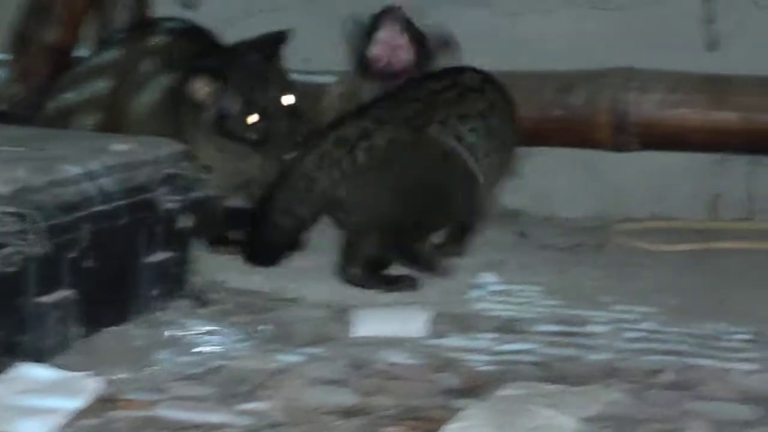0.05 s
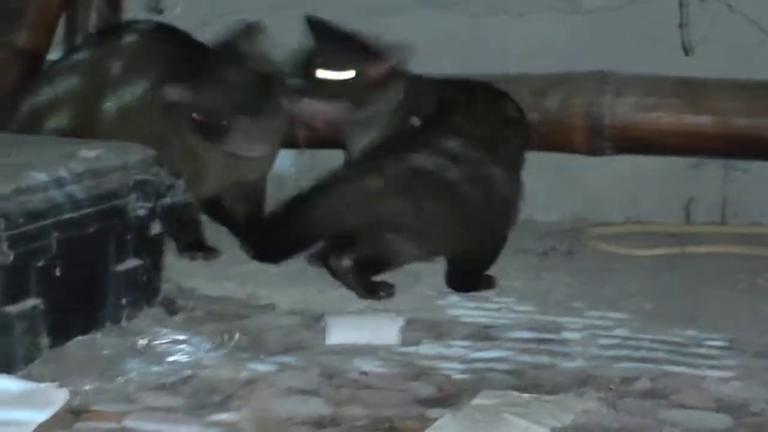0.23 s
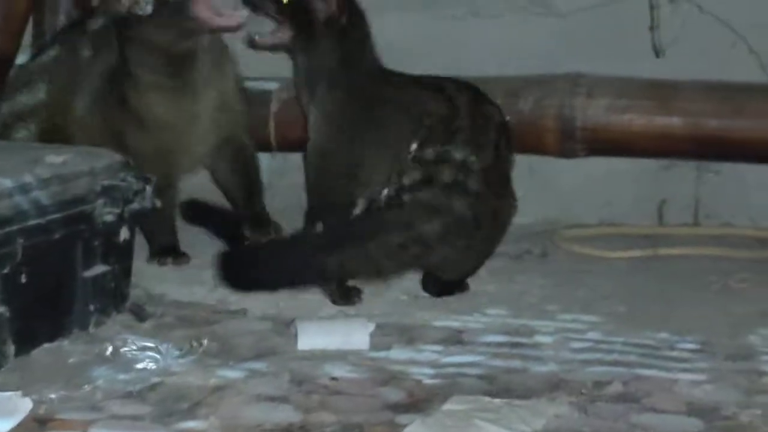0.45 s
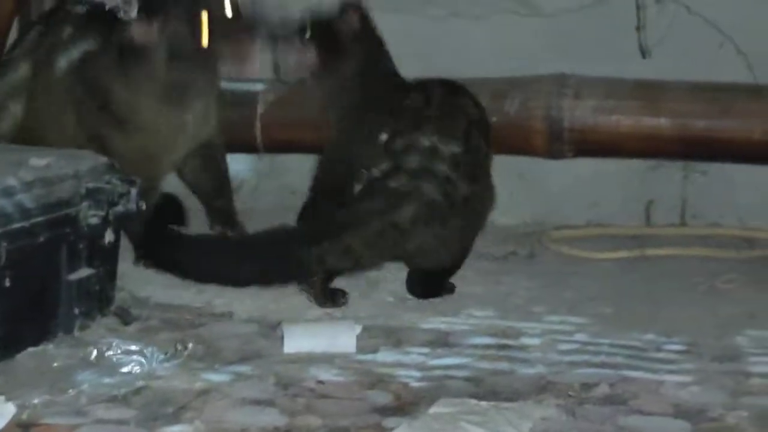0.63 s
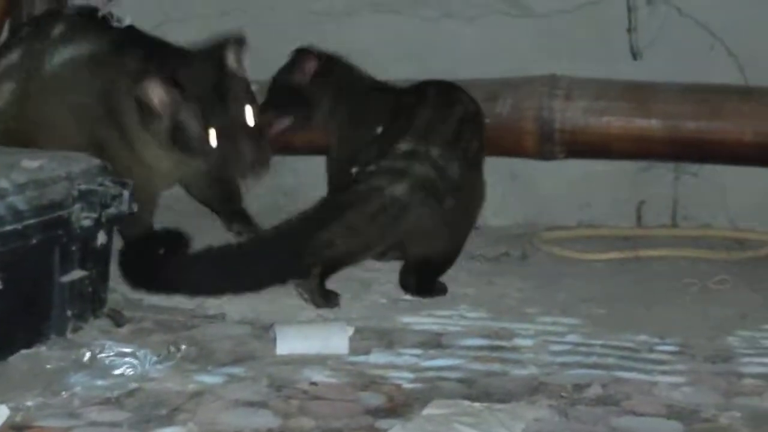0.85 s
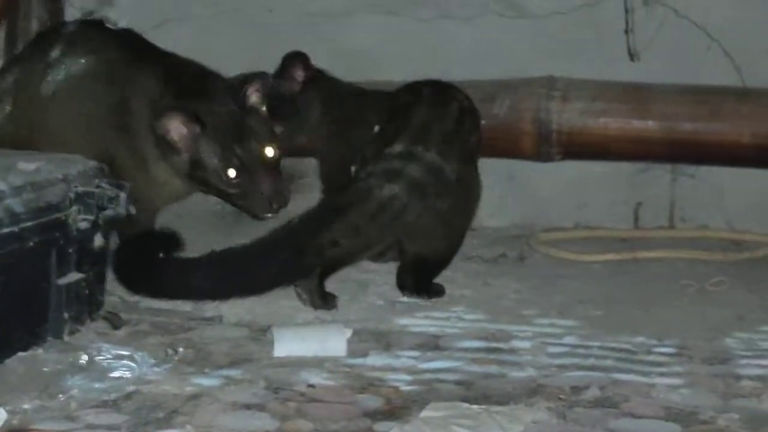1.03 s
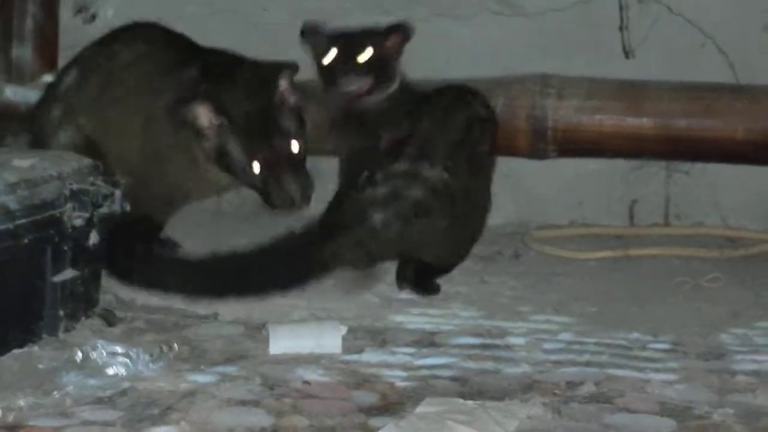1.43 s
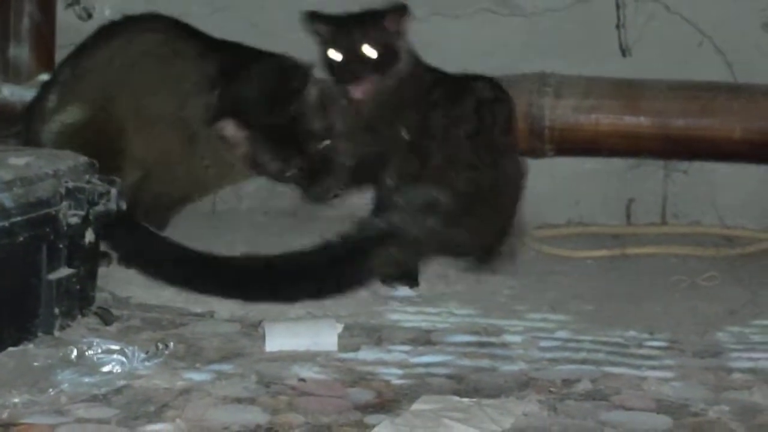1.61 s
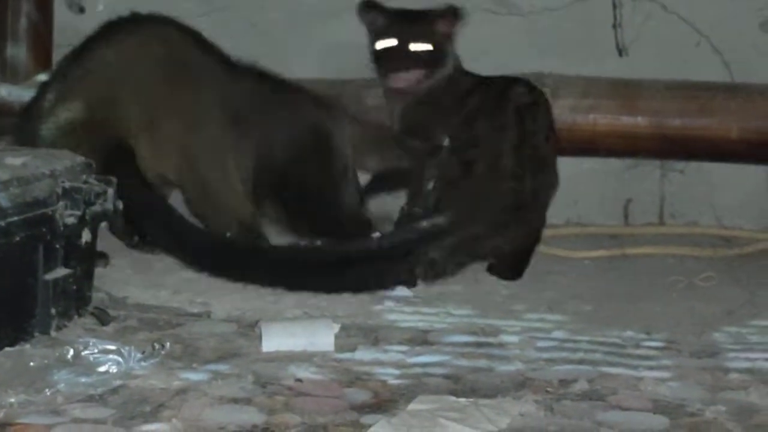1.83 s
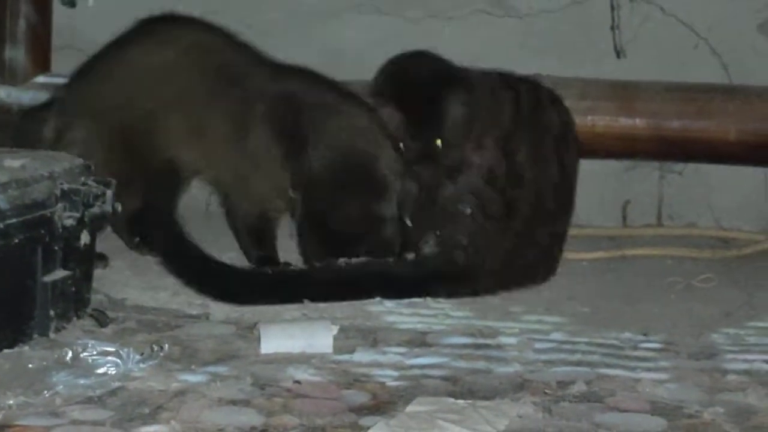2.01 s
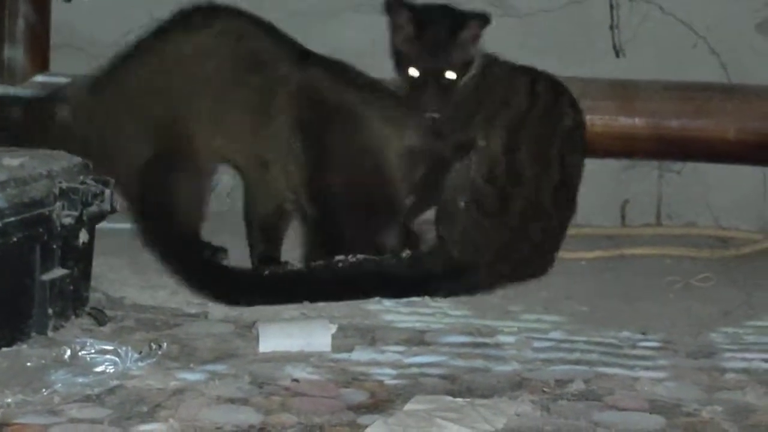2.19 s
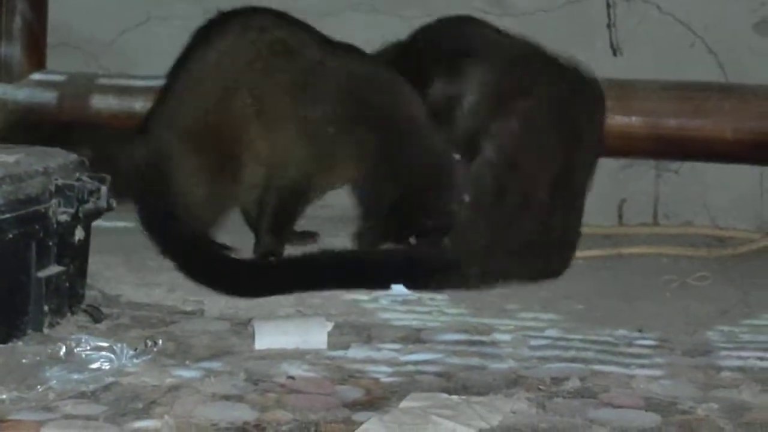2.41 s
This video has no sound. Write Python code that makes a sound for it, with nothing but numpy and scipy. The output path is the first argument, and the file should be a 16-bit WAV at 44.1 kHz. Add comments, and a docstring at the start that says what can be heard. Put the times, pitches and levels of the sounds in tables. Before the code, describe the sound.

Two civets squabble close by in a small, slightly echoing room. Raspy squeaky chatter at 0.2 seconds leads to a brief shriek at 0.4, then a hoarse grumble and snarl until 0.8. After a lull, a sharp yip comes at 1.7, a wavering whine from 1.8 to 2.2, a whimper, and a loud squeak at 2.5. Claws occasionally scuff the hard floor, and a faint low machine hum throbs throughout.

```python
"""Two civets squabble on the hard floor of a small bare room, close to a stereo microphone pair.
Their arched squeaks, whines and raspy chatter are a strong fundamental plus overtones shaped by the
throat, turning hoarse in places. Claws scuff the floor now and then; floor, crate and walls throw back
short echoes. Farther back a low machine hum throbs over rumble and faint hiss."""
import sys
import numpy as np
from scipy import signal
from scipy.fft import rfft, irfft
from scipy.io import wavfile

SR = 44100
rng = np.random.default_rng(int(sys.argv[2]) if len(sys.argv) > 2 else 0)


def store_pcm(level_fs):
    """Save levels as 16-bit WAV."""
    pcm = np.round(np.clip(level_fs, -1, 1) * 32767).astype(np.int16)
    wavfile.write(sys.argv[1], SR, np.atleast_2d(pcm).T)


N = 112454
TIME_S, BIN_HZ = np.arange(N) / SR, np.arange(N // 2 + 1) * SR / N
TOP_HZ = 15700


def undb(db):
    """Decibels to gain."""
    return 10 ** (np.asarray(db) / 20)


def unit(x):
    """Scale to rms 1."""
    return x / np.sqrt(np.mean(x ** 2) + 1e-30)


def at(hz, points):
    """Read (freq_hz, value) points on a log-frequency axis."""
    freqs, values = np.array(points, float).T
    return np.interp(np.log(np.maximum(hz, 1)), np.log(freqs), values)


def noise(gain):
    """Noise of rms 1, coloured by a gain at each frequency."""
    return unit(irfft(rfft(rng.standard_normal(N)) * gain, N))


def stereo_noise(gain):
    """Independent noise at each microphone."""
    return np.array([noise(gain), noise(gain)])


def wander(hz):
    """Smooth random drift with changes up to about hz."""
    return noise(np.exp(-(BIN_HZ / hz) ** 2))


def pan(db):
    """Microphone gains for a level difference; positive is to the left."""
    return unit(undb(np.array([[db], [-db]]) / 2))


# Machine hum tones: pitch_hz, level_db
HUM_TONES = [(78.4, -53.5), (120, -61), (192.5, -69)]


def machine_hum(waver=.35, waver_hz=9, throb_db=3):
    """A machine in the background: each low tone wavers, and all throb together."""
    hum = 0
    for hz, db in HUM_TONES:
        drift = 1 + waver * (wander(waver_hz) + 1j * wander(waver_hz))
        tone = np.exp(2j * np.pi * (hz * TIME_S + rng.random()))
        hum += undb(db) * np.sqrt(2) * np.real(drift * tone)
    return hum * undb(throb_db * wander(12))


# Room tone spectra: freq_hz, relative_db
RUMBLE_SPECTRUM = [(20, -15.5), (38, -11.5), (52, -1.5), (64, 12.5), (78, -8.5), (90, -3.5), (104, 9),
                   (135, -5), (160, -10), (230, -12.5), (300, -20.5), (500, -43.5), (900, -43)]
HISS_SPECTRUM = [(240, -42), (400, 3), (605, -7.5), (694, -1), (1050, -7.5), (1360, -14), (1610, -11.5),
                 (2710, -5), (3460, -13), (5230, -11), (7440, -24), (7910, -22.5), (15500, -11.5)]


def room_tone():
    """Rumble, nearly alike at both microphones, and a wide faint hiss; returns the two apart."""
    low = undb(at(BIN_HZ, RUMBLE_SPECTRUM)) * (BIN_HZ < 1500)
    high = undb(at(BIN_HZ, HISS_SPECTRUM))
    rumble = undb(-53) * (noise(low) + .25 * stereo_noise(low))
    hiss = undb(-70.5) * (.3 * noise(high) + stereo_noise(high))
    return rumble, hiss


# Reverberation of the bare room: band_hz, t60_s, relative_db
REVERB_BANDS = [(500, .31, -0.5), (1023, 0.21, -2), (2500, 0.22, -4), (5000, 0.22, -10),
                (9000, 0.21, -10.5), (14070, .18, -8.5)]


def reverb(sound, gain_db=-8.5, delay_s=.012, build_s=.002):
    """Dense wall reflections, different at each microphone; the treble dies first."""
    late_s = np.maximum(TIME_S - delay_s, 0)
    spectrum = rfft(rng.standard_normal((2, N)))
    response = 0
    for hz, t60, db in REVERB_BANDS:
        band = at(BIN_HZ, [(row[0], row[0] == hz) for row in REVERB_BANDS])
        tail = (1 - np.exp(-late_s / build_s)) * np.exp(-np.log(1000) * late_s / t60)
        response += irfft(spectrum * band, N) * undb(db) * tail / np.linalg.norm(tail)
    return undb(gain_db) * signal.fftconvolve(sound, response, axes=1)[:, :N]


# Echo paths from floor, crate and walls to the microphones: left_delay_ms, right_delay_ms, gain_db
ECHO_PATHS = [(0.906, 1.1, -12), (2.738, 2.6, -13), (5.25, 5.8, -15), (13.2, 17, -9.5), (43.9, 40, -21)]


def with_echoes(sound):
    """Direct sound plus echoes off hard surfaces, which make overtones uneven and fray call endings."""
    out = sound.copy()
    for *delays_ms, db in ECHO_PATHS:
        for mic, ms in enumerate(delays_ms):
            out[mic] += undb(db) * np.pad(sound[mic], (int(ms * SR / 1000), 0))[:N]
    return out


# Swells of high hiss: centre_s, half_length_s, level_db
HISS_SWELLS = [(1.825, 0.055, -58.5), (2.325, 0.02, -58.5)]


def hiss_swells(centre_hz=14000, width_hz=1400):
    """Faint airy hiss that rises and falls at both microphones."""
    colour = np.exp(-((BIN_HZ - centre_hz) / width_hz) ** 2)
    envelope = sum(undb(db) * np.exp(-((TIME_S - s) / half) ** 2) for s, half, db in HISS_SWELLS)
    return envelope * stereo_noise(colour)


# Claws and fur on the floor: peak_s, level_db, decay_s, centre_hz
FLOOR_SCUFFS = [(0.091, -45.5, 0.011, 2500), (.09, -56.5, 0.0097, 1080), (0.092, -54, 0.011, 9000),
                (.32, -60, 0.017, 5540), (.889, -55, 0.0091, 5000), (1.263, -73, 0.0064, 6000),
                (1.568, -74.5, 0.006, 5950), (1.592, -67.5, .008, 6090), (2.166, -38.5, 0.0094, 5130),
                (2.272, -78, .005, 5090), (2.474, -65, 0.014, 4500)]


def claw_scuffs(attack_s=.002, width_octaves=.35):
    """Claws rub the hard floor in brief bursts of band noise."""
    out = 0
    for peak_s, db, decay_s, hz in FLOOR_SCUFFS:
        octaves = np.log2((BIN_HZ + 1) / hz)
        colour = np.exp(-.5 * (octaves / width_octaves) ** 2) + .04 * (BIN_HZ > 400)
        age_s = TIME_S - peak_s
        envelope = np.clip(age_s / attack_s + 1, 0, 1) * np.exp(-np.maximum(age_s, 0) / decay_s)
        out += undb(db) * envelope * stereo_noise(colour)
    return out


# Phase lead of the left microphone over the right: freq_hz, lead_rad
MIC_PHASE = [(300, .2), (1100, 0.92), (2200, 0.73), (4400, 0.88), (6100, 1.1), (8000, 2), (12000, 2.4)]


def partial(order, pitch_hz, phase):
    """One partial of the voice, reaching the left microphone slightly ahead in phase."""
    offset = np.array([[.5], [-.5]]) * at(order * pitch_hz, MIC_PHASE)
    return np.sqrt(2) * np.sin(order * phase + offset)


# Resonances of the throat: freq_hz, gain_db
THROAT_RESPONSE = [(900, -16.5), (1450, -36.5), (1900, -19.5), (2450, -4), (3200, 0.5), (3900, -3.5),
                   (4800, -2), (5500, 3.5), (6300, -17.5), (7600, -8.5), (9300, -26), (10700, -22.5),
                   (12500, -35), (14300, -25), (15500, -38)]


def throat_gain(hz, tilt_db_per_octave, mouth_hz, mouth_db):
    """Throat resonances, tilted in brightness and lifted by one mouth resonance."""
    mouth = mouth_db * np.exp(-((hz - mouth_hz) / 450) ** 2)
    tilt = tilt_db_per_octave * np.log2(np.maximum(hz, 500) / 4000)
    return undb(at(hz, THROAT_RESPONSE) + mouth + tilt) * (hz < TOP_HZ)


# Contours of the close calls: time_s, pitch_hz, fundamental_db, second_harmonic_db, overtones_db
CHATTER = [(0.163, 506.1, -45.5, -54.5, -64.5), (0.175, 643.9, -35, -42.5, -50),
           (0.183, 674.8, -31, -57.5, -56), (0.195, 713.7, -31, -52, -47.5),
           (0.209, 985.9, -25, -45.5, -33.5), (0.229, 980.9, -40, -43, -44.5),
           (0.237, 973.1, -28.5, -60, -36), (0.245, 917.7, -33, -47.5, -40),
           (0.26, 896.3, -37.5, -67, -49.5)]
SHRIEK = [(0.346, 829.6, -43, -60.5, -32), (0.354, 882.4, -34.5, -48.5, -17.5),
          (0.366, 1070, -22, -38.5, -14.5), (0.376, 1073, -23, -37, -13), (0.395, 1001, -35.5, -55, -29)]
GRUMBLE = [(0.545, 860, -59, -76, -67), (0.569, 863.5, -50.5, -55, -62), (0.581, 782, -44.5, -73, -48),
           (0.591, 597, -52, -45.5, -38), (0.601, 619.7, -51, -51, -39), (0.615, 726, -42.5, -57, -41.5),
           (0.623, 765, -48.5, -56, -48.5), (0.639, 741, -38.5, -72, -63), (0.672, 773, -56, -72, -87)]
SNARL = [(0.674, 570.3, -62, -66, -80), (0.68, 589.4, -41, -56, -67), (0.704, 561.5, -42, -42, -53.5),
         (0.724, 698, -40.5, -57, -22.5), (0.742, 744.7, -36, -45.5, -26.5), (0.75, 797.6, -42, -71, -26.5),
         (0.762, 889, -36.5, -43, -32.5), (0.785, 889, -49, -69, -44)]
YIP = [(1.673, 618, -44, -52, -38), (1.679, 708.6, -49, -57, -28), (1.693, 804, -35, -53, -14),
       (1.707, 783.5, -33, -40.5, -20.5), (1.713, 753, -43, -82, -31.5), (1.718, 724, -36.5, -52, -24)]
LONG_WHINE = [(1.847, 556, -45.5, -49, -43.5), (1.865, 740.5, -37, -56.5, -28),
              (1.879, 811, -39, -49, -19.5), (1.895, 841.3, -36, -44, -21.5), (1.913, 811, -36.5, -48, -38),
              (1.931, 820, -39, -82, -40), (1.943, 815, -37, -58, -69), (1.953, 659, -36, -48, -97),
              (1.985, 639.6, -28, -43, -43), (2.001, 609, -75, -47, -56), (2.037, 596, -35, -50.5, -49),
              (2.049, 693, -37.5, -59, -54), (2.071, 682, -59, -47, -54.5), (2.087, 693, -40.5, -61, -38.5),
              (2.105, 867, -27.5, -44.5, -29), (2.123, 988, -25.5, -37.5, -27.5),
              (2.139, 975.5, -41.5, -38, -33.5), (2.16, 1000, -46, -88, -77)]
WHIMPER = [(2.249, 908, -47, -71, -86), (2.259, 952, -32.5, -67, -69), (2.267, 968, -37, -59, -55.5),
           (2.281, 804, -36.5, -57, -49.5), (2.305, 910, -28, -53.5, -37), (2.317, 892, -29.5, -54, -44.5),
           (2.327, 887, -26.5, -62, -33.5), (2.335, 905, -27.5, -61, -48.5),
           (2.349, 1028, -37.5, -47, -42.5), (2.371, 893.4, -36.5, -64, -49), (2.382, 888, -31.5, -51, -60)]
LAST_SQUEAK = [(2.496, 760, -41, -63.5, -42.5), (2.512, 765, -41, -48.5, -42.5),
               (2.528, 850, -38, -55, -39), (2.54, 980, -44, -51, -51), (2.548, 950, -16, -32, -9)]
# Colour of each call: contour, overtone_gain_db, tilt_db_per_octave, mouth_hz, mouth_db
CALL_COLOURS = [ (CHATTER, -.5, -3, 2900, 3), (SHRIEK, 1, 1.2, 5300, 1.5), (GRUMBLE, 0, -3, 3100, 5),
                (SNARL, 0, 0, 2820, 3.4), (YIP, 0.94, 0, 5030, 5.8), (LONG_WHINE, 0, 0, 3140, 2.1),
                (WHIMPER, 0, 0, 3250, 4.8), (LAST_SQUEAK, 0, -10, 4200, 0.76), ]
# Grain and place between the microphones, in the same order: roughness, low_pan_db, high_pan_db
CALL_PLACES = [(.11, -.5, -2), (.16, -4.5, 1), (.12, 0, -.5), (.16, 1, -4), (.13, -7, -.5), (.1, -3, 0),
               (.07, 4, .5), (.1, -.5, 1)]
# Hoarse stretches: start_s, end_s, added_roughness
HOARSE_SPANS = [(.16, .203, .3), (.23, .26, .2), (.346, .358, .06), (.58, .615, .42), (.674, .71, .33),
                (.718, .742, .05), (.75, .785, .25), (1.85, 1.93, .04), (2.338, 2.368, .2)]
JITTER, SHIMMER, RASP_NOISE = .085, .45, 1.1  # depths per unit of roughness
FLUTTER_DB, SUBHARMONIC = 2.5, .5
FADE_S, HOARSE_RAMP_S = .007, .004


def civet_call(colour, roughness, low_pan_db, high_pan_db):
    """One close call: an unsteady harmonic voice, with pulsed rasp through the same throat."""
    contour, overtone_gain_db, *throat = colour
    times, pitches, first_db, second_db, overtones_db = np.array(contour, float).T
    on = (TIME_S > times[0] - FADE_S) & (TIME_S < times[-1] + FADE_S)
    t = TIME_S[on]
    level = lambda db: undb(np.interp(t, times, db))
    hoarse = sum(added * np.clip(np.minimum(t - start, end - t) / HOARSE_RAMP_S + 1, 0, 1)
                 for start, end, added in HOARSE_SPANS)
    rough = roughness + hoarse
    hz = np.interp(t, times, pitches) * (1 + JITTER * rough * wander(190)[on])
    phase = 2 * np.pi * np.cumsum(hz) / SR

    orders = range(3, 24)
    weights = [throat_gain(k * hz, *throat) * undb(FLUTTER_DB * wander(120)[on]) for k in orders]
    overtones = sum(weight * partial(k, hz, phase) for k, weight in zip(orders, weights))
    overtones /= np.linalg.norm(weights, axis=0)
    breath = stereo_noise(throat_gain(BIN_HZ, *throat) * (BIN_HZ > 400))[:, on]
    rasp = breath * unit(1 + np.cos(phase))  # one puff per cycle
    share = RASP_NOISE * rough
    high = (overtones + share * rasp) / np.sqrt(1 + share ** 2) * level(overtones_db + overtone_gain_db)

    # Hoarse cycles alternate strong and weak, adding a partial at 1.5 times the pitch.
    growl = SUBHARMONIC * hoarse * wander(150)[on] * partial(1.5, hz, phase)
    growl *= throat_gain(1.5 * hz, *throat) / throat_gain(hz, *throat)
    low = (partial(1, hz, phase) + growl) * level(first_db) + partial(2, hz, phase) * level(second_db)

    fade = np.clip(np.minimum(t - t[0], t[-1] - t) / FADE_S, 0, 1) ** 3
    shimmer = 1 + SHIMMER * rough * wander(300)[on]
    out = np.zeros((2, N))
    out[:, on] = (low * pan(low_pan_db) + high * pan(high_pan_db)) * fade * shimmer
    return out


def scene():
    """Civets near the microphones, the room around them, hum and rumble a little to the right."""
    calls = sum(civet_call(colour, *place) for colour, place in zip(CALL_COLOURS, CALL_PLACES))
    near = calls + claw_scuffs() + hiss_swells()
    in_room = with_echoes(near) + reverb(near)
    hum = machine_hum()
    rumble, hiss = room_tone()
    return in_room + (hum + rumble) * pan(-2.2) + hiss


def record(dry):
    """The recorder rounds the loudest peaks and cuts the top treble."""
    rounded = dry / (1 + (dry / .9) ** 8) ** (1 / 8)
    lowpass = signal.ellip(10, .2, 70, TOP_HZ, fs=SR, output="sos")
    return signal.sosfilt(lowpass, rounded)


dry = scene()
out = record(dry)
store_pcm(out)
```